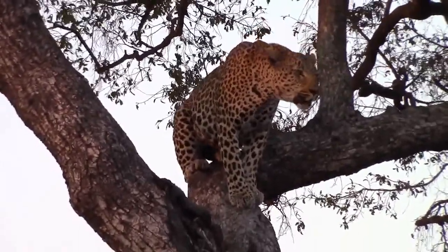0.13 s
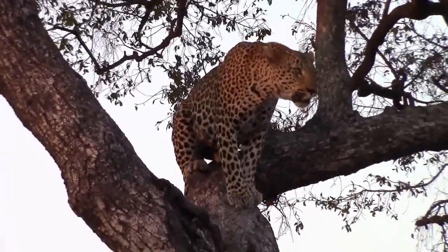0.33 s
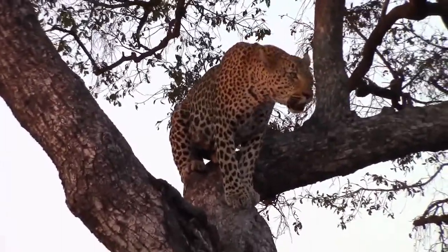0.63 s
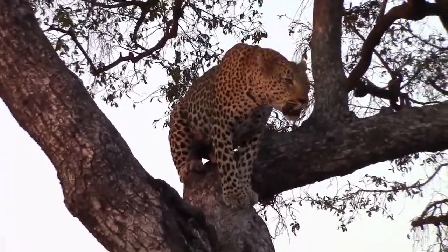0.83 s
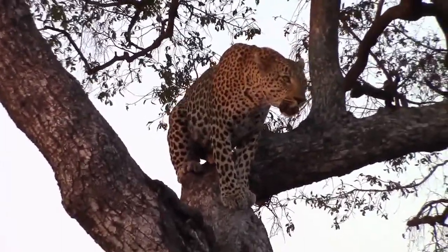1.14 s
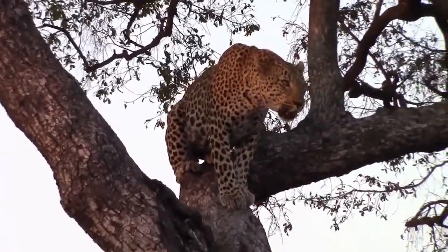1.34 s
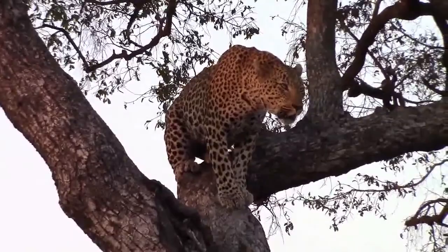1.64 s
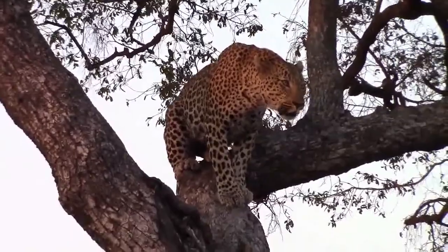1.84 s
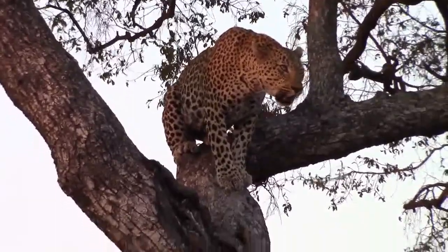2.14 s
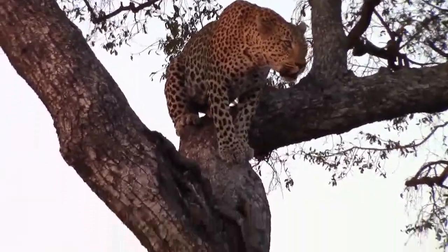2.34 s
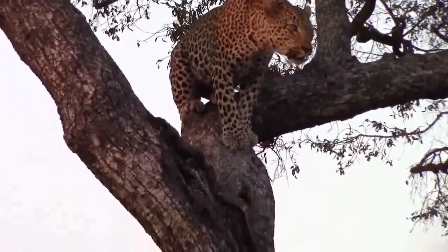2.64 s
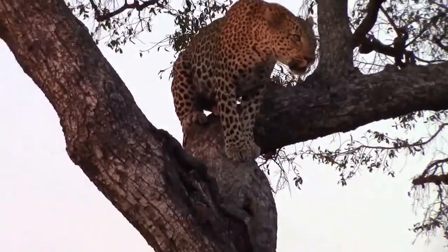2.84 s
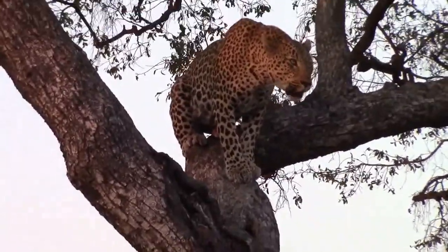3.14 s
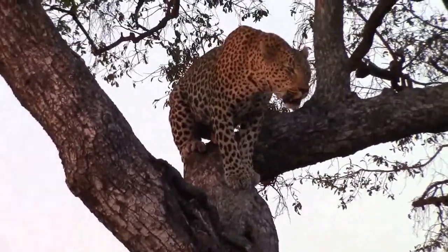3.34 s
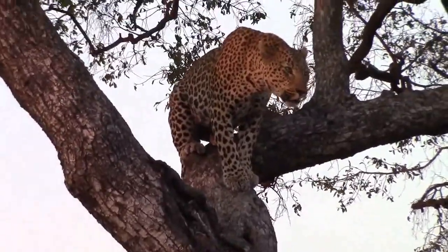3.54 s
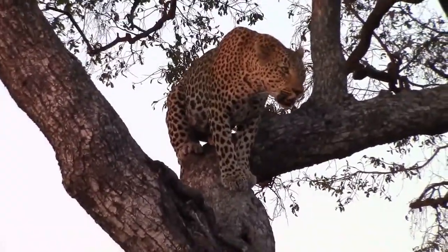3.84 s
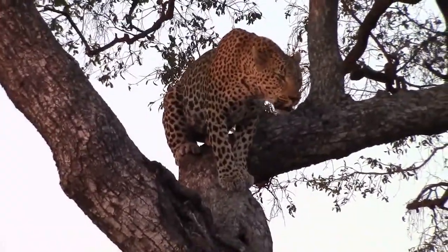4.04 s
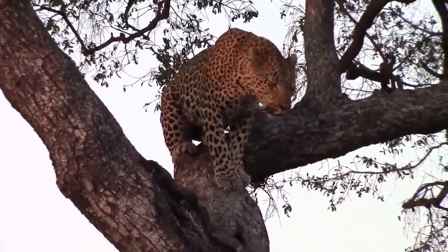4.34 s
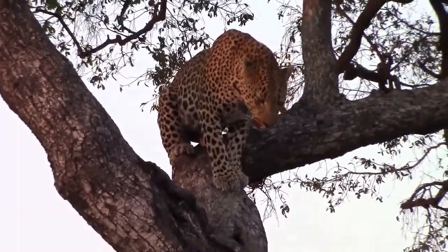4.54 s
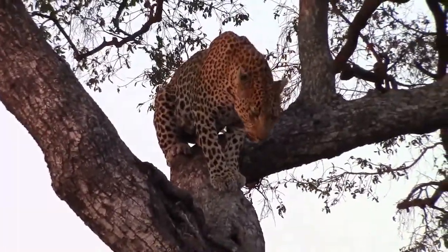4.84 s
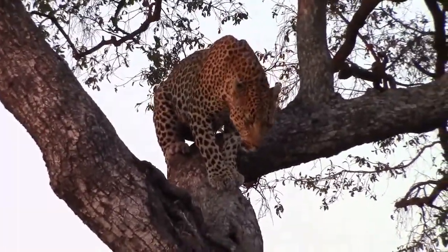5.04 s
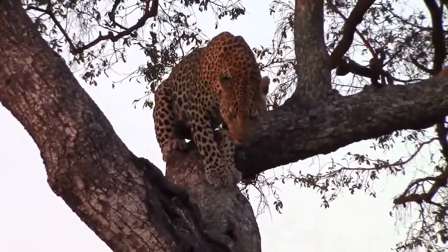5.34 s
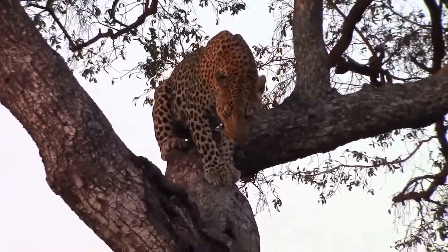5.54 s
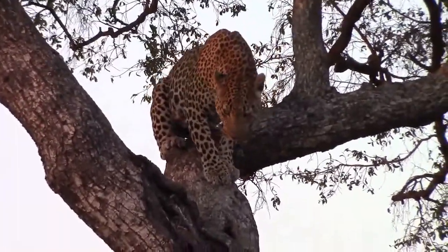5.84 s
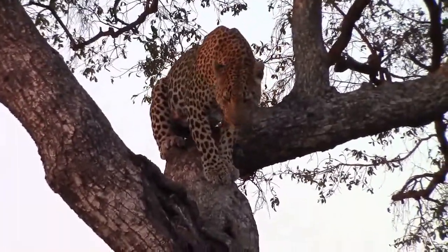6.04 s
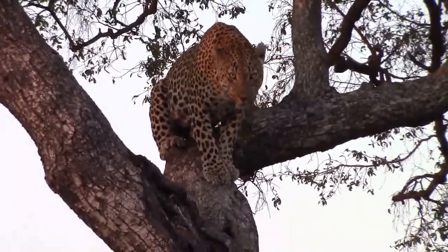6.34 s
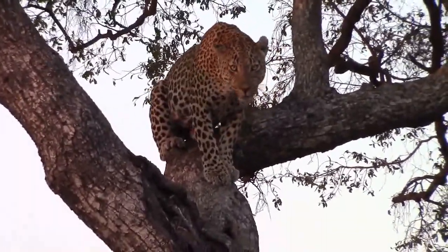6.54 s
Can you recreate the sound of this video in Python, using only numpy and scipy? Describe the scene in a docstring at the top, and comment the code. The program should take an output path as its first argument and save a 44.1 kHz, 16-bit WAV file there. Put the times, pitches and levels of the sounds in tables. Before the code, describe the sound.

A leopard gives seven deep, sawing grunts with rasping breaths between them, over light wind on the microphone and a few clicks.

```python
"""A big cat in a tree saws out seven grunts, with a rasping breath drawn in between each and the next.
Its voice is a source and a filter: slow slaps of the vocal folds excite the resonances of a long
throat, and turbulent breath hisses with them. Trunks and ground scatter a thin echo. Nearer by, wind
buffets the microphone ports, a shutter-like mechanism clicks a little to the left, and wood is
scraped and tapped. Behind it all the open bush hisses faintly."""
import sys
import numpy as np
from scipy import signal
from scipy.fft import rfft, irfft
from scipy.io import wavfile
from scipy.ndimage import uniform_filter1d

SR = 44100
rng = np.random.default_rng(int(sys.argv[2]) if len(sys.argv) > 2 else 0)


def master_out(mix):
    """Clip the mix to full scale and print it as 16-bit PCM to the path in sys.argv[1]."""
    frames = np.transpose(np.atleast_2d(mix))
    ceiling = np.clip(frames, -1, 1)
    pcm = np.round(ceiling * 32767).astype(np.int16)
    wavfile.write(sys.argv[1], SR, pcm)


N = 295508

# Levels are relative within each table. Noise spectra (f/Hz, spectral level/dB):
BUSH_SPECTRUM = [(180, -26), (300, -10), (535, -5), (1350, -14), (1440, -12), (2560, -17.5), (3630, -21),
                 (4070, -20), (15500, -35.5)]
RUMBLE_SPECTRUM = [(25, -38), (50, -9), (90, -3), (140, 1), (220, -5.5), (350, -23.5), (600, -32.5),
                   (1200, -54)]
BUFFET_SPECTRUM = [(80, 1), (150, -13), (230, -3.5), (350, -5.5), (600, -18.5), (1300, -29)]
BREATH_SPECTRUM = [(2000, -9), (3500, 3), (4700, -6.5), (5600, -6), (6600, -5.5), (8500, -7.5),
                   (11000, -16), (15500, -46)]
# Level of the background hiss: dips after the loud opening, then recovers (t/s, level/dB):
BACKGROUND_LEVEL = [(0, -54.5), (.6, -64), (2.5, -53.5), (6.7, -55)]
# Slow envelope of the wind (t/s, level/dB):
WIND_LEVEL = [(0, -35), (.24, -37), (.33, -70), (.6, -58.5), (1.14, -45.5), (1.31, -52), (1.9, -51.5),
              (2.05, -57.5), (2.21, -38), (2.3, -53.5), (2.7, -34.5), (3.17, -49.5), (3.55, -30.5),
              (3.75, -42.5), (4.7, -43.5), (5.02, -31), (5.42, -38.5), (5.5, -51.5), (5.95, -39.5),
              (6.15, -45.5), (6.7, -38)]
# How alike the rumble sounds left and right: briefly wide, centred until 2 s, then widening
# (t/s, likeness from 0 to 1):
RUMBLE_LIKENESS = [(.25, 0.4), (.35, 0.98), (2.0, 0.99), (6.7, 0.4)]
# Hardest eddies (centre t/s, level/dB, left minus right/dB, f/Hz):
WIND_THUMPS = [(.016, -16.5, 18, 240), (0.033, -9, -10, 200), (.043, -19, 2, 195), (.053, -9.5, -4, 222),
               (0.063, -11, 6, 196), (.144, -13.5, 16, 194), (0.155, -21.5, 25, 184),
               (1.637, -14.5, -2.5, 233), (2.362, -23, -2, 184), (2.987, -17.5, 6.5, 234),
               (3.05, -26.5, -6, 224), (3.583, -7, -5, 158), (3.979, -19, -3, 115), (4.545, -22, 18, 231),
               (5.096, -24, 27, 170), (5.370, -28, 30, 178), (5.91, -29, -19, 174), (5.973, -27, 21, 159)]
# Impacts in the mechanism (t/s, level/dB, left minus right/dB, f/Hz, T60/s):
SHUTTER_CLICKS = [(0.0924, -18.5, -1, 2500, 0.023), (2.7847, -1, 5.5, 6040, 0.016),
                  (2.803, -7, 2, 4020, 0.012), (2.8374, -28, -12, 3660, 0.025),
                  (2.8466, -10, 3, 4030, 0.015), (2.8852, -16, 2.5, 3970, 0.015),
                  (2.9681, -19.5, 2, 2400, 0.062), (2.98, -33, 6, 3480, 0.045),
                  (3.023, -14, 1, 2240, 0.017)]
# Scrapes on wood (t/s, duration/s, level/dB, left minus right/dB):
WOOD_SCRAPES = [(3.066, 0.023, -37, 0.5), (5.583, 0.054, -40, 1)]
# Taps on wood (t/s, level/dB):
WOOD_TAPS = [(6.079, -36), (6.172, -37), (6.211, -31), (6.25, -34), (6.294, -37.5), (6.635, -36.5)]
# Modes of the wood, and of the throat breathing in and out (f/Hz, bandwidth/Hz, level/dB):
WOOD_MODES = [(295, 170, -2.5), (598, 43, 7.5), (940, 174, 0.5), (1640, 390, -3), (2200, 290, -6),
              (3000, 540, -10.5), (3950, 150, -17)]
INHALE_FORMANTS = [(259, 17.3, 5), (522.6, 31.7, 4.5), (577, 53, -1), (902, 15.2, -4), (1462, 49, -16),
                   (1736, 41, -10), (2070, 240, -17.5), (2335, 72, -17), (2570, 100, -19.5),
                   (3160, 120, -21.5), (3600, 94, -23.5), (4380, 210, -26), (6770, 2400, -42)]
LOW_FORMANTS = [(511, 60, -9), (600, 45.4, 5), (820, 65, -6.5), (928, 19.6, -6)]
HIGH_FORMANTS = [(1252, 49, -2), (1479, 28.5, 1), (1660, 86, -3), (1812, 30.5, 4.5), (2010, 62, -0.5),
                 (2310, 132, -5.5), (2730, 18, -14.5), (3250, 87, -15), (3670, 220, -16), (4740, 56, -16),
                 (5760, 81, -31.5), (6470, 96, -25)]
# Chest resonance as a grunt starts (f/Hz, bandwidth/Hz):
CHEST_MODE = (201, 31)
# Breaths in (start t/s, full t/s, release t/s, throat level/dB, hiss re throat/dB, thin air level/dB):
INHALATIONS = [(0.701, 0.907, 0.93, -38.5, -3, -61), (1.411, 1.615, 1.677, -40, -2.5, -55),
               (2.163, 2.447, 2.57, -42, -11, -53.5), (3.146, 3.34, 3.42, -36, -7.5, -57),
               (3.859, 4.13, 4.18, -33.5, -7, -61), (4.727, 4.94, 5.1, -53, 2.5, -67.5)]
# Loudest lone slaps of the folds, mostly on the breath in (t/s, level/dB):
LONE_SLAPS = [(0.808, -40), (0.913, -34), (1.561, -35), (1.659, -34), (1.74, -27), (2.184, -38),
              (2.35, -40), (2.416, -43), (2.624, -29), (3.157, -33.5), (3.225, -38), (3.272, -34.5),
              (3.318, -28.5), (3.363, -21), (3.404, -32), (3.478, -26), (3.929, -34.5), (4.145, -23.5),
              (4.186, -24), (4.296, -26), (5.023, -33), (5.161, -14.5)]
# Grunts (first slap t/s, period/s, growth of each period after the fourth/s, slap count, rise/s,
# hold/s, top level/dB, drop on release/dB, upper throat gain/dB, chest gain/dB, hiss re upper throat/dB):
GRUNT_PULSE_TRAINS = [(.2285, .0278, .0016, 12, .065, .12, -21, 6, -16, -8, -6),
                      (1.0177, .0221, .0055, 9, .04, .07, -16.5, 15, -14, -4, -1),
                      (1.7535, .0226, .005, 8, .05, .02, -12, 9, -13, -3.5, -3),
                      (2.6545, .0224, .0025, 10, .05, .10, -13, 11, -16, -4.5, -1),
                      (3.500, .0227, .003, 8, .04, .11, -11, 14, -17, -2, -0.8),
                      (4.3115, .0225, .0027, 8, .05, .09, -10.5, 14, -17, -1.5, -0.8),
                      (5.1792, .0247, .001, 9, .03, .11, -15, 16, -14, -3, -3)]


def undb(db):
    """Amplitude ratio of a level in decibels."""
    return 10 ** (np.asarray(db) / 20)


def unit(x):
    """Normalisation to rms 1."""
    return x / np.sqrt(np.mean(x ** 2))


def curve(table):
    """Linear interpolation of a (t/s, value) table at every sample."""
    return np.interp(np.arange(N) / SR, *np.transpose(table))


def wander(rate_hz, size=N):
    """Random modulation of rms 1: ramps between values drawn at rate_hz."""
    step = int(SR / rate_hz)
    held = np.repeat(rng.standard_normal(size // step + 1), step)
    return unit(uniform_filter1d(held, step)[:size])


def shaped_noise(spectrum):
    """Spectral shaping of white noise, normalised to rms 1."""
    hz, db = np.transpose(spectrum)
    f = np.arange(N // 2 + 1) * SR / N + 1
    gain = undb(np.interp(np.log(f), np.log(hz), db, -90, -90))
    return unit(irfft(rfft(rng.standard_normal(N)) * gain, N))


def resonate(x, modes, tuning=0.99, flicker_db=0.):
    """Superposition of modes of alternating sign; tuning scales their frequencies, flicker their drive."""
    out, clock = 0, np.cumsum(tuning * np.ones(len(x))) / SR
    for k, (hz, width, db) in enumerate(modes):
        phasor, pole = np.exp(2j * np.pi * hz * clock), np.exp(-np.pi * width / SR)
        drive = x * undb(db + (flicker_db * wander(50, len(x)) if flicker_db else 0))
        amplitude = signal.lfilter([1 - pole], [1, -pole], drive * phasor.conj())
        out = out + (-1) ** k * 2 * np.real(phasor * amplitude)
    return out


def stereo(mid, side, likeness):
    """Partial coherence: left and right are the weighted sum and difference of two noises."""
    return np.sqrt((1 + likeness) / 2) * mid + np.sqrt((1 - likeness) / 2) * np.array([side, -side])


def add(out, x, start, db, pan_db):
    """Superposition of a short sound, placed by the level difference between left and right."""
    i = int(start * SR)
    x = x[..., :N - i]
    out[:, i:i + x.shape[-1]] += x * undb(db + np.array([[pan_db], [-pan_db]]) / 2)


def bush():
    """Ambient noise: the open bush gives a faint broadband hiss, much alike left and right."""
    hiss = stereo(shaped_noise(BUSH_SPECTRUM), shaped_noise(BUSH_SPECTRUM), likeness=0.84)
    return hiss * undb(curve(BACKGROUND_LEVEL))


def wind():
    """Turbulent pressure: eddies buffet the ports, brighter in gusts; the hardest land as thumps."""
    t = np.arange(N) / SR
    swells = [undb(db - 14.5) * np.exp(-np.abs(t - centre) / 0.019) for centre, db, _, _ in WIND_THUMPS]
    gust = undb(curve(WIND_LEVEL)) + np.max(swells, axis=0)

    def eddies(spectrum):
        mid, side = (unit(shaped_noise(spectrum) * undb(3.76 * wander(25))) for _ in range(2))
        return stereo(mid, side, curve(RUMBLE_LIKENESS))

    out = undb(2) * gust * eddies(RUMBLE_SPECTRUM) + undb(11) * gust ** 1.495 * eddies(BUFFET_SPECTRUM)
    lag = np.arange(-int(0.013 * SR), int(0.013 * SR)) / SR
    for centre, db, pan_db, hz in WIND_THUMPS:
        thump = np.sin(2 * np.pi * hz * lag + 0.96) * np.exp(-(lag * hz / 0.58) ** 2)  # a cycle or two
        add(out, thump, centre + lag[0], db, pan_db)
    return out


def shutter():
    """Impact noise: small hard parts click, each a decaying burst through one broad resonance."""
    out, t = np.zeros((2, N)), np.arange(int(.07 * SR)) / SR
    for start, db, pan_db, hz, t60 in SHUTTER_CLICKS:
        burst = rng.standard_normal((2, len(t))) * np.exp(-np.log(1000) * t / t60)
        click = signal.lfilter(*signal.iirpeak(hz, Q=1.6, fs=SR), burst)
        click = signal.lfilter(*signal.butter(3, 10500, fs=SR), click)
        add(out, stereo(*click, likeness=.85), start, db - 5, pan_db)
    return out


def wood():
    """Forced vibration: friction and light blows excite the same damped modes of a wooden body."""
    out, t = np.zeros((2, N)), np.arange(int(.07 * SR)) / SR
    for start, duration, db, pan_db in WOOD_SCRAPES:
        gate = np.clip(np.minimum(t, duration - t) / 0.0022, 0, 1)
        mid, side = (unit(resonate(gate * rng.standard_normal(len(t)), WOOD_MODES)) for _ in range(2))
        add(out, stereo(mid, side, likeness=0.98), start, db, pan_db)
    for start, db in WOOD_TAPS:
        blow = uniform_filter1d(rng.standard_normal(len(t)) * np.exp(-t / 0.0091), size=8)
        tap = resonate(blow, WOOD_MODES)
        add(out, tap / np.abs(tap).max(), start, db, pan_db=0)
    return out


def echoes(direct, t60_s=0.27, level_db=-15):
    """Scattering: trunks and ground return a diffuse tail that decays exponentially."""
    t = np.arange(int(.4 * SR)) / SR
    response = rng.standard_normal(len(t)) * np.exp(-np.log(1000) * t / t60_s) * (t > .005)
    return undb(level_db) * signal.fftconvolve(direct, response / np.linalg.norm(response))[:N]


def fold_slaps(times, gains, roughness, decay_s, size=N):
    """Glottal source: each slap is a pulse and a turbulent rush; also returns the rush's envelope."""
    pulses = np.zeros(size)
    np.add.at(pulses, (times * SR).astype(int), gains)
    rush = signal.lfilter([1], [1, -np.exp(-1 / (decay_s * SR))], pulses)
    return uniform_filter1d(pulses, size=4) + roughness * rush * rng.standard_normal(size), rush


def inhalations(flutter_hz=26.75, weak_slaps_per_s=16, ticks_per_s=70):
    """Flow-induced flutter: air drawn past loose wet folds rattles, ticks and slaps in the throat."""
    t, throat, bright, thin = np.arange(N) / SR, 0, 0, 0
    for start, full, release, throat_db, hiss_db, thin_db in INHALATIONS:
        flow_db = 80 * np.minimum(t - full, 0) - 412 * np.maximum(t - release, 0)
        flow = undb(flow_db) * np.clip((t - start) / 0.019, 0, 1)
        throat += undb(throat_db) * flow
        bright += undb(throat_db + hiss_db) * flow
        thin += undb(thin_db) * flow
    loud_times, loud_db = np.transpose(LONE_SLAPS)
    weak = np.flatnonzero(rng.random(N) < weak_slaps_per_s / SR)
    times, gains = np.r_[loud_times, weak / SR], np.r_[undb(loud_db), throat[weak]]
    source, rush = fold_slaps(times, gains, roughness=0.091, decay_s=0.0075)
    soft_slaps = signal.lfilter(*signal.butter(1, 1200, fs=SR), source)
    flutter_phase = np.cumsum(flutter_hz * (1 + 0.33 * wander(14))) / SR % 1
    rattle = undb(2.5 * wander(45) + 4.5 * uniform_filter1d(1 - 2 * flutter_phase, size=150))
    snore = throat * rattle * unit(resonate(rng.standard_normal(N), INHALE_FORMANTS[:4]))
    ticks = uniform_filter1d((rng.random(N) < ticks_per_s / SR) * rng.standard_normal(N), size=7)
    wet_air = rng.standard_normal(N) + .4 * unit(ticks)
    hiss = unit(resonate(wet_air, INHALE_FORMANTS[4:], 1 + .012 * wander(12), flicker_db=3.5))
    rasps = undb(42.5) * resonate(soft_slaps, INHALE_FORMANTS, flicker_db=3.5)
    return rasps + snore + (bright * rattle + undb(-36) * rush) * hiss + thin * shaped_noise(BREATH_SPECTRUM)


def grunt_level(past_top, hold, drop_db, rise_db_per_s=175, sag_db_per_s=88.5, trail_db_per_s=120):
    """Exponential growth and decay, in dB re the top: the voice rises, sags, drops and trails off."""
    held_db = np.minimum(rise_db_per_s * past_top, -sag_db_per_s * np.minimum(past_top, hold))
    released = np.maximum(past_top - hold, 0)
    return held_db - drop_db * (1 - np.exp(-released / 0.049)) - trail_db_per_s * released


def grunts(lead_s=.034, brighten_db_per_s=46.5):
    """Source and filter: slaps slow as the breath runs out; the throat lengthens and its formants sink."""
    tube_modes = [(hz, 260, 0) for hz in np.arange(2900, 14000, 620)]  # higher modes of the throat
    breath = unit(resonate(shaped_noise(BREATH_SPECTRUM), tube_modes, 1 + .02 * wander(15), flicker_db=3))
    highpass = signal.butter(3, 120, "high", fs=SR, output="sos")
    out, t = np.zeros(N), np.arange(SR // 2) / SR
    brighten = undb(brighten_db_per_s * t)
    for (start, period, growth, count, rise, hold,
         top_db, drop_db, upper_db, chest_db, hiss_db) in GRUNT_PULSE_TRAINS:
        onset = int((start - lead_s) * SR)  # air flows before the first slap
        span = slice(onset, onset + len(t))
        voice = undb(top_db + grunt_level(t - lead_s - rise, hold, drop_db))
        flow = voice * np.minimum(t / .015, 1)
        periods = period + growth * np.maximum(np.arange(count - 1) - 3, 0)
        times = lead_s + np.cumsum(np.r_[0, periods])
        gains = voice[((times + .008) * SR).astype(int)]
        source, rush = fold_slaps(times, gains, roughness=0.059, decay_s=0.0094, size=len(t))
        source += undb(-36) * flow * rng.standard_normal(len(t))
        chest = undb(53.5 + chest_db) * resonate(source, [(*CHEST_MODE, 0)], tuning=1 - t)
        lower = undb(46.5) * resonate(source, LOW_FORMANTS, tuning=1 - 0.074 * t)
        upper = undb(43) * resonate(source, HIGH_FORMANTS, tuning=1.005 - .08 * t, flicker_db=4)
        # the hiss builds slowly and swells a little at every slap
        swell = np.minimum(0.36 + t / 0.096, 1) * (0.5 * flow + 0.11 * uniform_filter1d(rush, size=300))
        hiss = swell * breath[span] * undb(hiss_db + 2.64 * wander(86.4, len(t)))
        out[span] += signal.sosfilt(highpass, chest + lower)
        out[span] += undb(upper_db) * (brighten * upper + brighten ** 0.19 * hiss)
    return out


def scene():
    """Superposition: the cat straight ahead, its echoes, the background and the sounds close by."""
    cat = grunts() + inhalations()
    return cat + echoes(cat) + bush() + wind() + shutter() + wood()


def record(dry):
    """Soft saturation rounds the loudest peaks; a low-pass filter limits the bandwidth."""
    lowpass = signal.ellip(8, .2, 70, 15500, fs=SR, output="sos")
    return signal.sosfilt(lowpass, np.tanh(0.57 * dry) / 0.64)


dry = scene()
out = record(dry)
master_out(out)
```